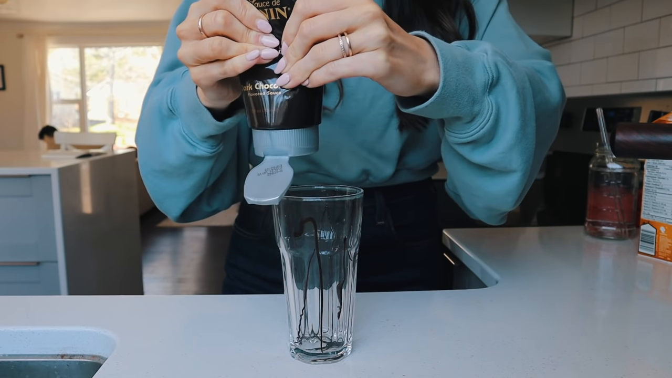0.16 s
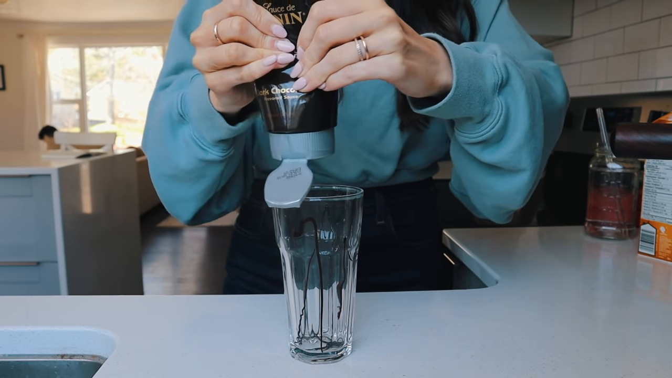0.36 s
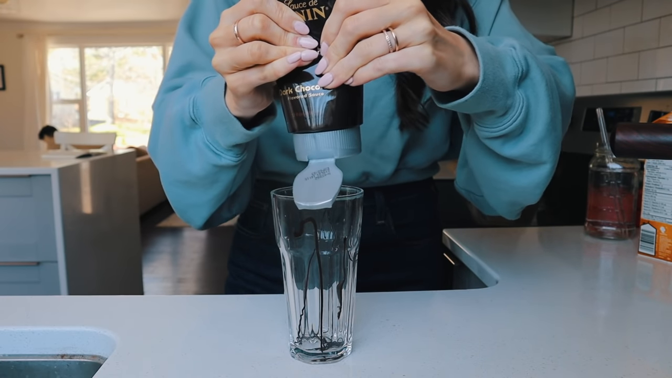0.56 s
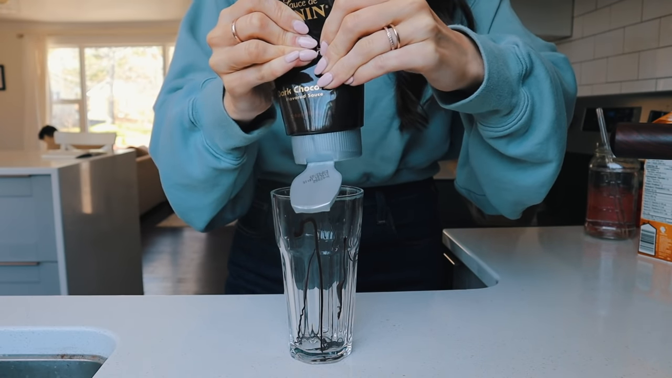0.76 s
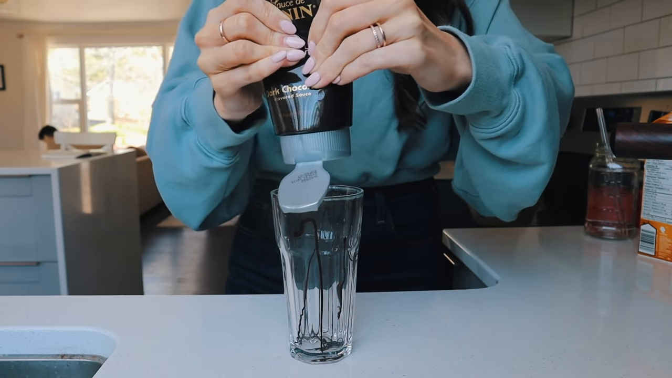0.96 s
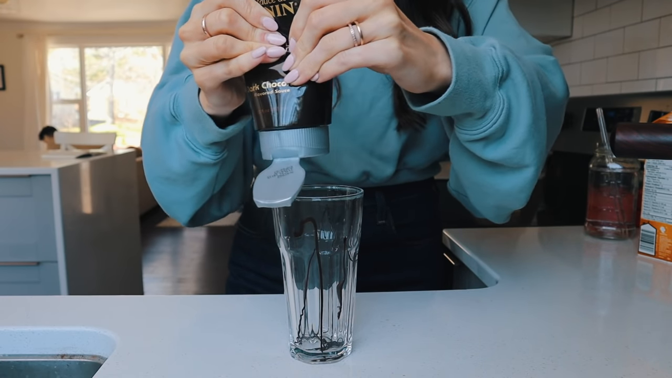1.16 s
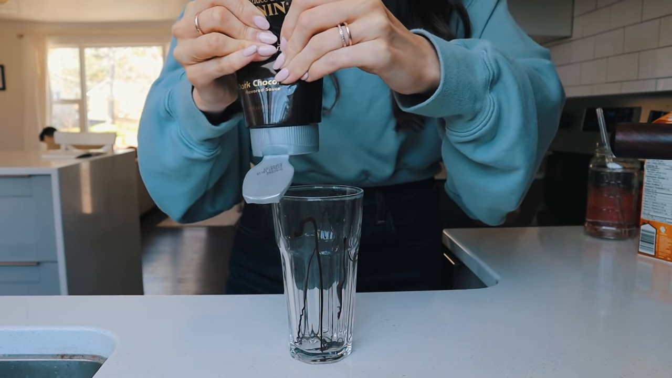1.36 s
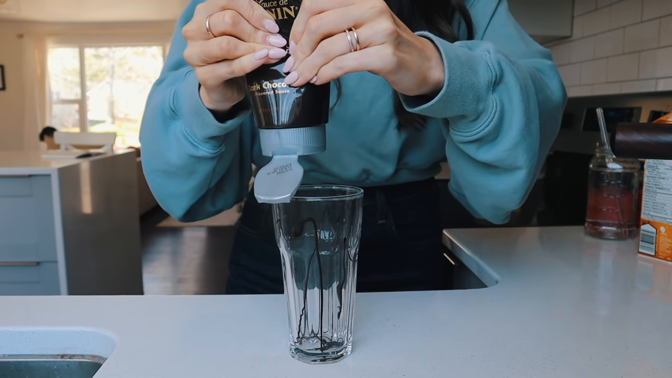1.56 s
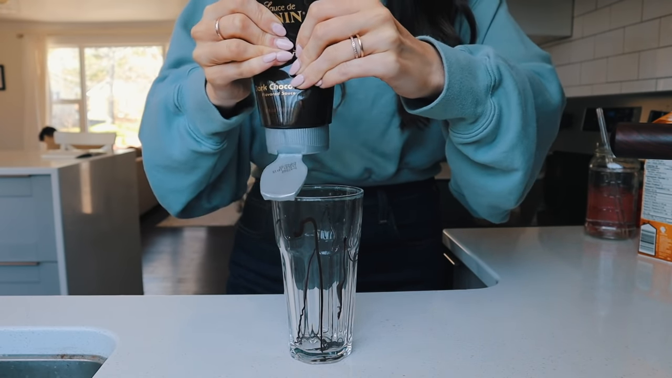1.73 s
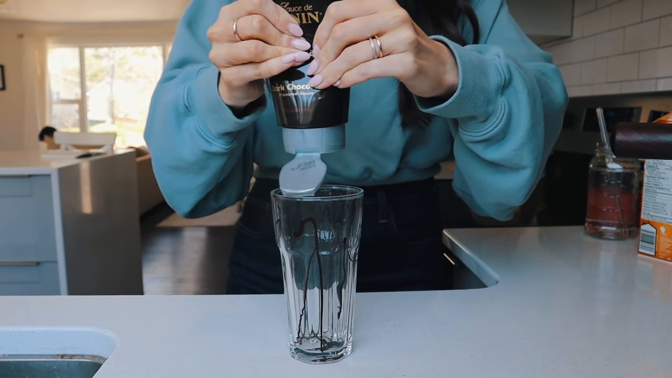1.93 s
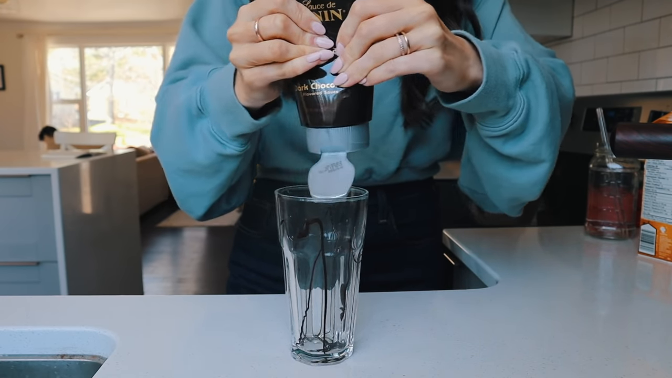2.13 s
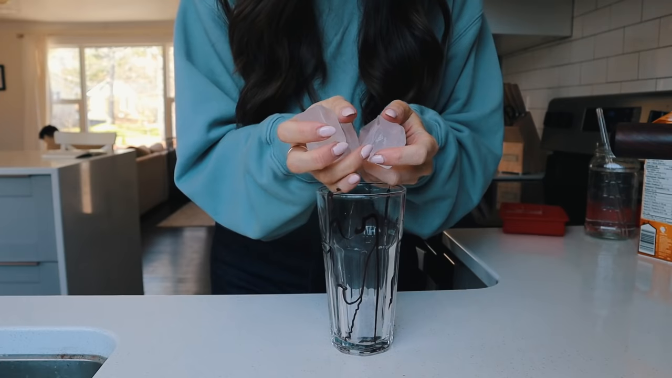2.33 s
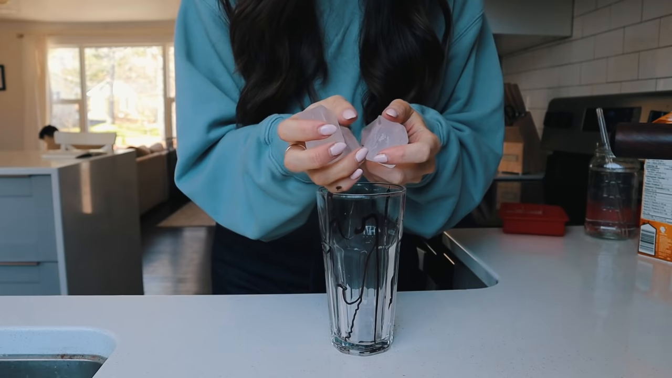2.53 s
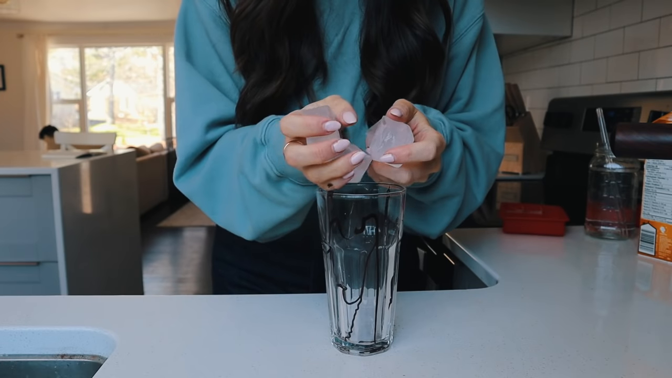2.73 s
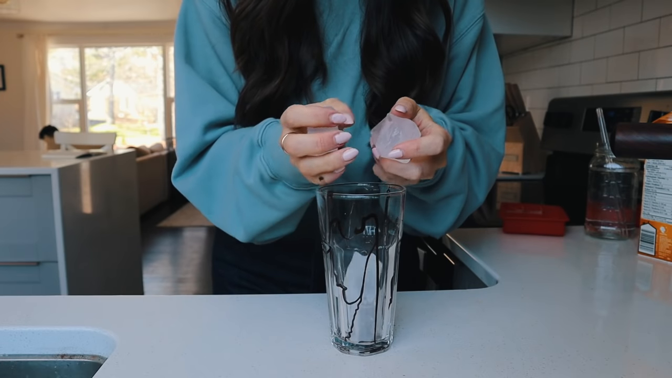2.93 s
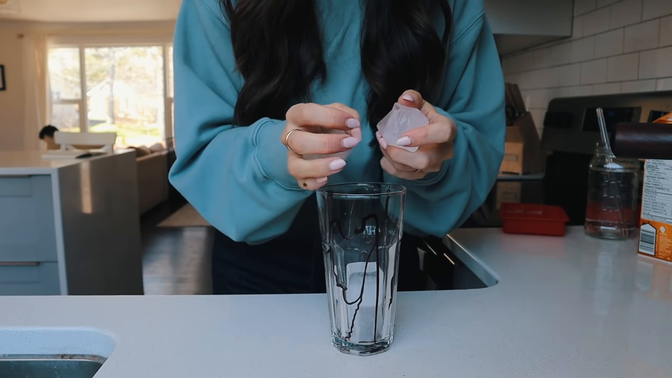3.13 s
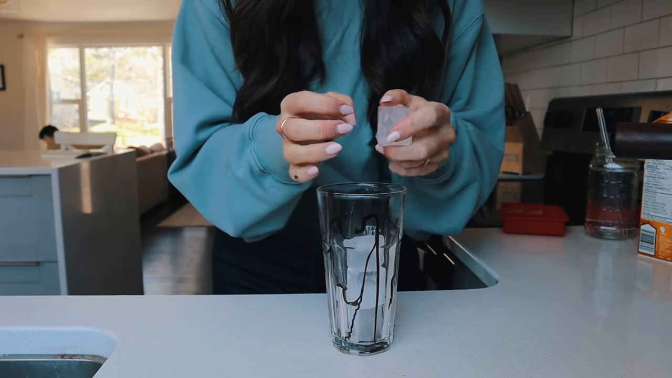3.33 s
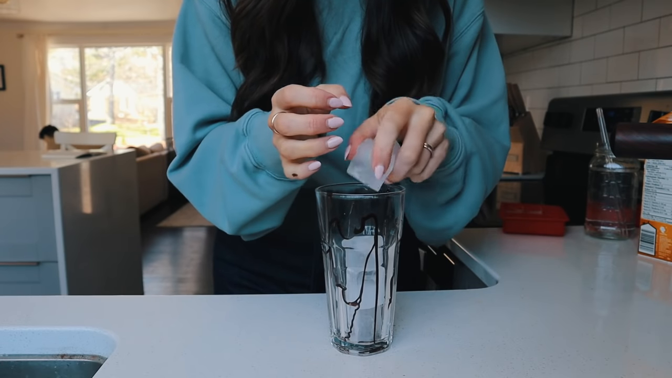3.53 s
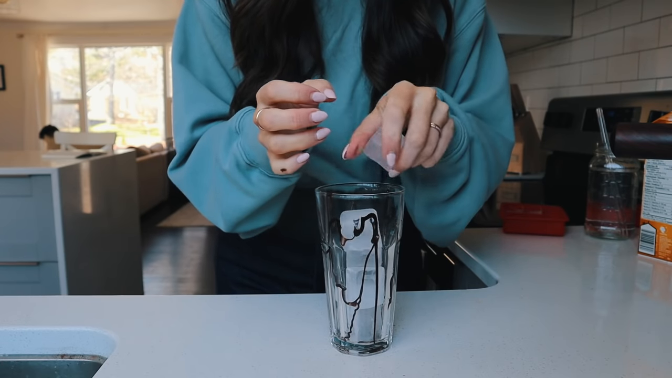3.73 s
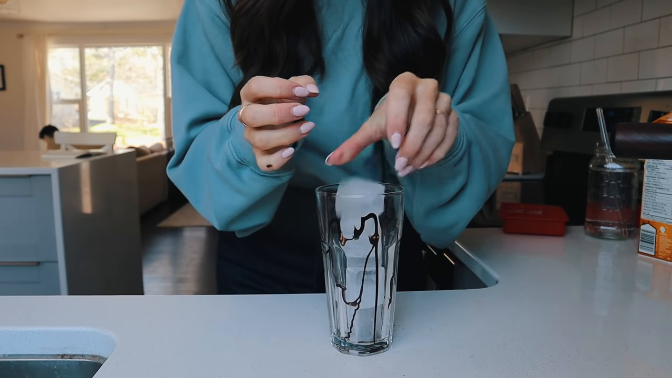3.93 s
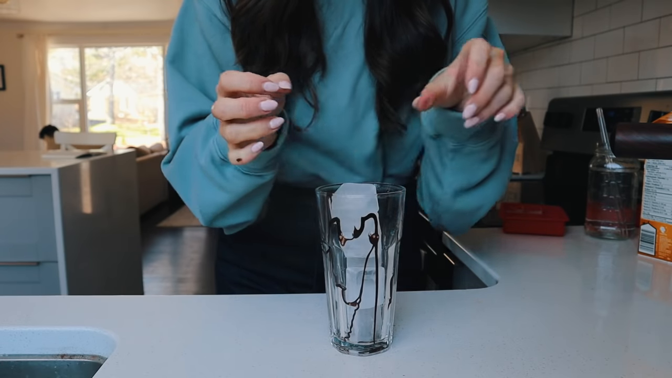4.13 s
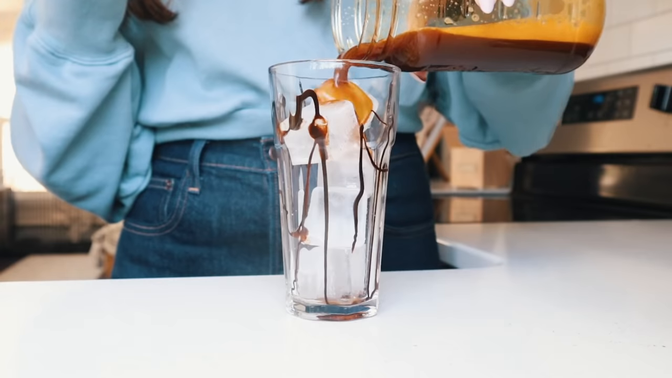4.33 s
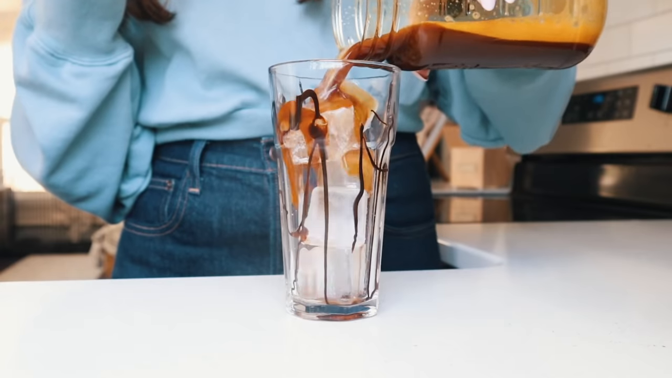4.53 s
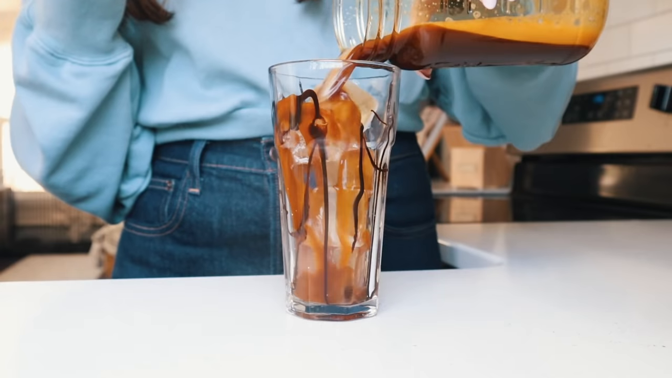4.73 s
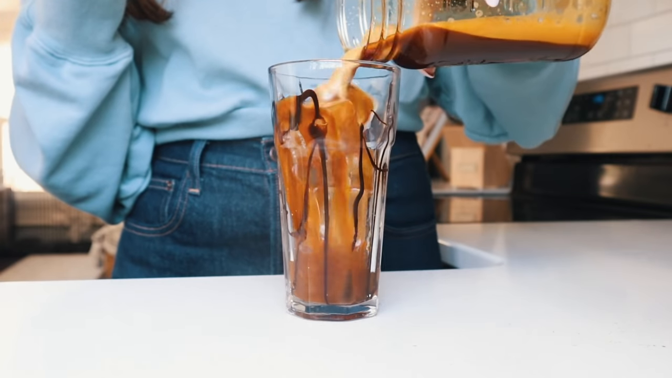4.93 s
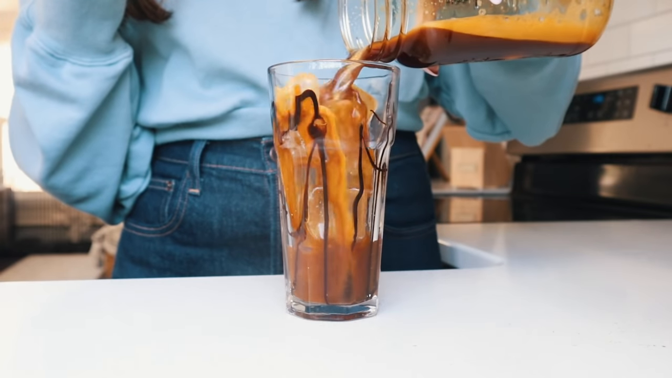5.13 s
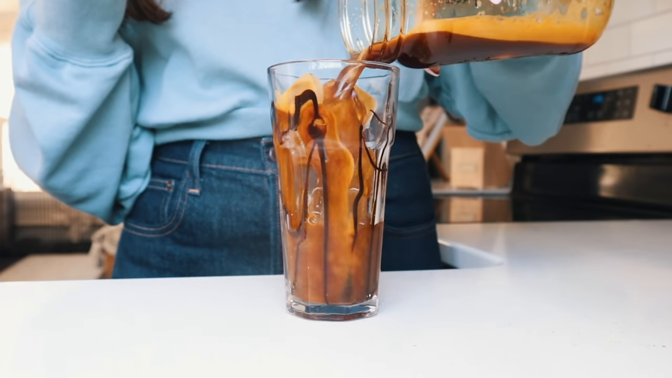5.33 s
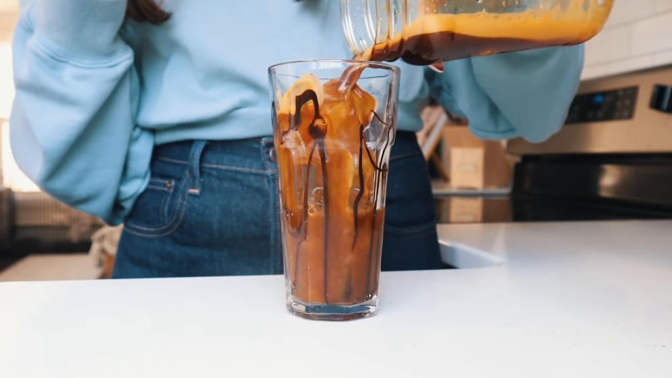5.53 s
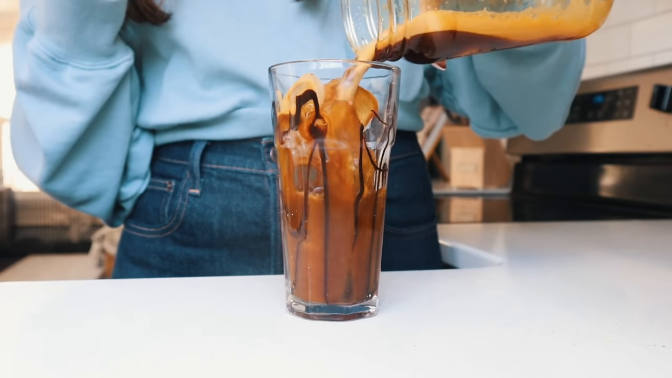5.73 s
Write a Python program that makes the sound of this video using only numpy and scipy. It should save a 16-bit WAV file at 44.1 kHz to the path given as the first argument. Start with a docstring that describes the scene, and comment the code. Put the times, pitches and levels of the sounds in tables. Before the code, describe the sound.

A small live kitchen, heard close in stereo, with a steady low appliance whir and hum behind. At about 0.8 s a squeezed syrup bottle lets out a faint, fading puff of air. Barely audible touches and scrapes of ice begin near 1.8 s. At 2.3 s the first cube drops into a tall thick glass with a bright clink, hollow knocks and a low counter thud, bouncing until 2.5. Another lands around 3.0, a strong clear ring comes at 3.25 with knocks after it, and more clinks follow at 3.7 and 4.0, shorter and drier as the glass fills. The hum softens during the last cubes, then returns. From about 4.4 s coffee trickles in quietly, swelling and easing, with rising bubbles, fine foam fizz and tiny ice cracks, the sharpest near 4.87. Shifting ice gives damped clinks around 5.1 to 5.2; the pour continues to the end, near 5.9.

```python
"""Ice cubes drop one by one into a tall, thick glass on a kitchen counter: decaying tones ring its wall, noise knocks.
Coffee is then poured over them: rising tones bubble over splashing noise, and the ice cracks, shifts and strikes
the filled, damped glass. Bursts of noise contacts make the ice scrape; a syrup bottle spits a puff of noise.
A small live room answers every hit with a decaying noise tail; an appliance whirs (shaped noise) and hums behind."""
import sys
import numpy as np
from scipy import signal
from scipy.fft import rfft, irfft
from scipy.io import wavfile
from scipy.ndimage import uniform_filter1d

SR = 44100
rng = np.random.default_rng(int(sys.argv[2]) if len(sys.argv) > 2 else 0)


def put_to_file(sound):
    """Save the sound as 16-bit audio at rate SR, in the file named by the first command-line argument."""
    columns = np.atleast_2d(sound).T  # one column per channel
    safe = np.clip(columns, -1, 1)
    whole_steps = np.round(safe * 32767)
    wavfile.write(sys.argv[1], SR, whole_steps.astype(np.int16))


N = 259308

# ringing modes of the bare glass wall, lowest first: pitch_hz, twin_offset_hz, t60_s (both before loading by ice)
WALL_MODES = [(2116, 9.4, 0.35), (4116, 1, 0.33), (5014, 5, 0.15), (7054, 44, .11), (8373, 64, 0.12),
              (10825, 180, 0.14)]
# how each wall mode reaches the two ears: left_minus_right_db, phase_between_ears_rad
WALL_EARS = [(-.5, .8), (-1, .9), (-1, .6), (-1, 2.2), (-1.5, 2), (-1.5, 2.1)]
# how each wall mode answers a blow: level_db, rim_family (+1 strongest at the rim, -1 strongest lower down)
WALL_ANSWER = [(-1.5, -0.052), (-8, 1), (-6.5, -1.01), (-12.5, 1), (-8.5, -0.88), (-8.5, 0.3)]
# resonances of the counter under the glass: pitch_hz (typical), t60_s, relative_level_db
COUNTER_MODES = [(129, 0.2, -1), (260, 0.024, -16), (295.7, 0.027, 11), (346.7, 0.046, 0), (438, 0.03, 5)]
# the glass changes with each cube and last with the coffee; state from each time on:
# start_s, air_pitch_hz, air_level_db (relative to the knock), free_ring_share (0-1),
# lowest_mode_left_minus_right_db
FILLING = [(0, 676, 8, 0.6, 4), (2.25, 608, -7, 1, 3.5), (2.9, 716, -1, 0.86, -2.5),
           (3.2, 746.3, 2, 0.88, 0.5), (3.7, 724, -1.5, 0.67, 9.5), (3.95, 695, -10, 0.42, 1),
           (4.3, 702, -5.5, 0.16, -1.5)]
# cubes striking the wall (the first row, at 1.798 s, is a light click on the glass before any cube falls): #
# start_s, ring_db, tilt_db_per_octave, rim_nearness_db, knock_db, # hardness_db (crack relative to knock),
# free_ring_share (0-1, what the touching cube leaves)
CLINKS = [(1.798, -48, -2, 0, -49, 8, 1), (2.093, -40, -5, -5, -47, 2, 0.8),
          (2.3, -13.5, 1, -3.5, -18, -6, 0.73), (2.313, -19.5, -11.5, 10.5, -26.5, -10, 0.92),
          (2.3539, -27.5, 6, -8, -20.5, 1, 0.64), (2.9735, -18, 1.5, -3, -22.5, -0.5, 0.82),
          (3.042, -16.5, -8.5, -14, -27.5, 4, 1), (3.072, -19.5, -16.5, -20.5, -33.5, 5, 1),
          (3.2501, -6, -7.5, 4, -27, 8.5, 0.85), (3.3315, -17, 0.5, -9.5, -42, 16, 0.31),
          (3.7315, -15, -4, 3, -23, 4.5, 1), (3.7375, -9, -8.5, 4.5, -25, -2.5, 0.82),
          (3.7515, -22, 3.5, -9, -20.5, 7, 0.78), (3.998, -22, -0.5, 9.5, -21, 6.5, 1),
          (4.0048, -14.5, 3, -4, -24, 2.5, 0.95), (4.0845, -27, -9.5, -9, -33, 2.5, 0.67),
          (5.1172, -21.5, 2, 11, -22.5, 8, 0.66), (5.1578, -45, -6, -8, -34.5, 13, 0.9),
          (5.1682, -16.5, 1, 11.5, -27.5, 7.5, 1), (5.1865, -26, 6.5, 7.5, -44, 6, 1)]
# cubes landing on the bottom or bumping others: start_s, knock_db, counter_weight_db (relative to knock),
# hardness_db (crack relative to knock)
LANDINGS = [(2.1203, -31.5, -0.5, -19), (2.146, -30.5, -2, -20.5), (2.163, -35.5, -18, -20),
            (2.18, -38, 3.5, -39.5), (2.3685, -15.5, -4, 8.5), (2.437, -24, -6.5, 0), (2.481, -33, 3, -12),
            (2.9988, -19, 7, 2.5), (3.0035, -19, -7.5, -14), (3.151, -32.5, -6.5, -9),
            (3.3105, -17, 0, -2.5), (3.3215, -19.5, -11.5, 4.5), (3.394, -25.5, -16, 3),
            (3.409, -22, -1.5, -1.5), (3.459, -28.5, -14, -15), (3.5127, -31.5, -8, -15)]
# cubes grinding past each other and along the wall: start_s, length_s, level_db (before scaling by length),
# treble_db, air_column_db (both balances within the scrape)
SCRAPES = [(1.958, 0.15, -48.5, -41, 5.5), (2.146, 0.055, -41, -49.5, 2),
           (2.311, 0.029, -21.5, -30.5, 17.5), (2.421, 0.05, -34.5, -24.5, -26.5),
           (2.972, 0.042, -19.5, -15.5, 4.5), (3.314, 0.026, -25.5, 6, 3), (3.398, 0.038, -31, -12, -2.5),
           (3.729, 0.023, -32, -22.5, -4.5), (4, 0.037, -19.5, 5, -1)]
# the clearest cracks of ice under the coffee, and a few bubbles that tick alike: start_s, cube_pitch_hz,
# body_db, bright_edge_db
CRACKS = [(4.534, 2010, -40.5, -57.5), (4.714, 3700, -41, -48), (4.739, 4100, -45.5, -54),
          (4.761, 3230, -45, -37), (4.8656, 3550, -16, -38), (4.896, 3600, -31, -58),
          (4.932, 2940, -39, -43.5), (4.97, 3340, -28, -47), (4.9943, 1800, -36, -52),
          (5.03, 3020, -35, -46), (5.0477, 3320, -24.5, -39.5), (5.384, 2520, -41, -42.5),
          (5.431, 2390, -49, -53), (5.444, 2490, -52, -63), (5.4789, 1680, -33.5, -60),
          (5.51, 2710, -33.5, -42), (5.517, 1870, -49, -45), (5.539, 2920, -36.5, -47),
          (5.545, 1980, -41, -42), (5.565, 2910, -63, -52), (5.604, 2950, -42, -56),
          (5.674, 3790, -39, -46), (5.73, 3000, -39, -42), (5.741, 4630, -40.5, -45),
          (5.796, 3320, -40, -36.5), (5.804, 3180, -48, -43), (5.815, 1750, -46, -42)]
# the largest bubbles in the pour: start_s, start_pitch_hz, level_db
BUBBLES = [(4.799, 1300, -35.5), (4.802, 1705, -38.5), (4.867, 710, -35.5), (4.932, 700, -24),
           (4.938, 1050, -39), (4.978, 626, -29.5), (4.982, 1700, -42.5), (5.029, 568, -33),
           (5.31, 945, -42.5), (5.403, 2360, -43), (5.416, 2470, -49), (5.485, 1114, -38.5),
           (5.572, 2850, -50), (5.61, 1130, -49), (5.813, 1190, -42.5), (5.826, 1720, -46)]
# strength of the trickle, to which each pouring layer adds its own offset: time_s, strength_db
FLOW = [(4.3, -75.5), (4.5, -45), (4.7, -47.5), (4.85, -32.5), (5.0, -38), (5.3, -43.5), (5.5, -35.5),
        (5.7, -42), (5.88, -40.5)]
# room tail by band: centre_hz, t60_s, relative_level_db, side_minus_mid_db
ROOM = [(150, 0.94, -8, -18.5), (450, 0.56, 4, -16), (1050, 0.68, 0, 4), (2200, 0.62, -2, 9),
        (3560, 0.55, -3.5, 11), (4930, 0.57, -3, 8), (7400, 0.37, -8.5, 1), (10300, 0.43, -7.5, -11),
        (14000, 0.3, -16.5, 6)]
# colour of the appliance's whir: pitch_hz, relative_level_db
WHIR = [(15, -42), (25, -11.5), (115, 0), (146, -9.5), (202, -10), (264, -0.5), (354, -9.5), (383, -9.5),
        (415, -14.5), (501, -11.5), (543, -15), (1030, -27), (9020, -49), (11500, -52.5), (15000, -80.5)]
# stereo width of the whir: pitch_hz, side_minus_mid_db
WHIR_SIDE = [(60, -42.5), (110, -22), (200, -17.5), (380, -11), (700, 0), (1290, 5.5), (2380, 6.5),
             (4400, 7.5), (8120, 5), (15000, 12.5)]
# hum lines of the appliance: pitch_hz, width_hz, level_db (before the background dips)
HUM = [(116.4, 1.8, -51.5), (265.2, 3.4, -47)]

TIME = np.arange(N) / SR
RING = TIME[TIME < 1 / 4]  # time since a blow, s
ATTACK = int(.012 * SR)  # samples over which the level of a blow is set
LEFT_RIGHT = np.array([[1], [-1]])

WHIR_DB = -38.5  # rms, before the background dips
# the background is heard more softly while the last cubes fall and is back for the pour
DIP_S, DIP_FALL_S, DIP_DB = 3.1, 0.3, -5.5

PUFF_S, PUFF_DB, PUFF_T60_S = .773, -45, 0.28

POUR_S = 4.3
BUBBLE_T60_S = 0.053
# smaller bubbles: typical pitch, spread in octaves, level relative to the trickle, ring
GURGLE_HZ, GURGLE_OCTAVES, GURGLE_DB, GURGLE_T60_S = 1504, 0.87, -18, 0.046
# the air above the coffee colours the splashing; level relative to the trickle
HOLLOW_HZ, HOLLOW_WIDTH_HZ, HOLLOW_DB = 1080, 220, -19.5

# cracks: snap under the cube's ring (length, relative level), and the faint ones in between
TICK_HZ, TICK_T60_S, TICK_NOISE_DB = 3000, 0.0087, -6  # typical pitch of the faint ones
FAINT_TICK_DB, FAINT_EDGE_DB = -13.5, 1  # relative to the trickle; edge relative to the body
# a cube's own modes: spread in octaves, ring, level relative to the crack
CUBE_OCTAVES, CUBE_T60_S, CUBE_DB = 0.358, 0.021, -7
STRUCK_CUBE_HZ, STRUCK_CUBE_DB = 3112, -6.5  # the same modes in a falling cube

AIR_T60_S, AIR_OVERTONE, AIR_OVERTONE_DB = 0.11, 1.53, -2  # overtone as a pitch ratio
TWIN_DB = -10.5  # weaker twin of each wall mode
NODE_TURN_RAD = 0.77  # spread of the phase between the ears from blow to blow
CHATTER, CHATTER_HZ = 0.66, 67  # full depth and typical speed of the flutter that loose ice gives to the ring
CLINK_THUD_DB = -6.5  # relative to the knock
# a landing shakes the wall only faintly and dully, far from the rim
LANDING_RING_DB, LANDING_TILT_DB, LANDING_RIM_DB, RING_PER_HARDNESS = -7, -5, -5, 0.3
TILT_PER_HARDNESS = 0.12  # dB per octave for each dB: a soft bump leaves the high wall modes still
LANDING_FREE = 0.44  # share of the wall's ring that a landed cube leaves

TOP_HZ = 15700


def undb(db):
    """Decibels to gain."""
    return 10 ** (np.asarray(db) / 20)


def curve(rows, t):
    """Straight lines between (time_s, value) rows."""
    return np.interp(t, *np.transpose(rows))


def spectrum(rows, freqs):
    """Gain from (pitch_hz, level_db) points joined on a log-frequency axis."""
    hz, db = np.transpose(rows)
    return undb(np.interp(np.log(freqs), np.log(hz), db))


def unit(x):
    """Scale to rms 1."""
    return x / np.sqrt(np.mean(x ** 2))


def struck(x, db):
    """Scale a blow so that its attack has this rms level."""
    return x * undb(db) / np.sqrt(np.mean(x[..., :ATTACK] ** 2))


def band(x, lo_hz, hi_hz, order=2):
    """Keep only the sound between two pitches (causal band-pass)."""
    edges = [lo_hz, np.clip(hi_hz, lo_hz + 1, SR / 2 - 1)]
    return signal.sosfilt(signal.butter(order, edges, "band", fs=SR, output="sos"), x)


def add(out, s, x):
    """Mix a sound in at time s."""
    i = int(s * SR)
    out[:, i:i + x.shape[-1]] += x[..., :N - i]


def ears(size, side):
    """Two noises that share all but their side part."""
    mid, diff = rng.standard_normal((2, size))
    return np.array([mid + side * diff, mid - side * diff]) / np.sqrt(1 + side ** 2)


def fade(t60, t=RING):
    """Exponential decay by 60 dB in t60 seconds."""
    return np.exp(-np.log(1000) * t / t60)


def mode(hz, t60, phase=0):
    """One decaying resonance that builds within its first cycle."""
    build = 1 - np.exp(-(2 * hz * RING) ** 2)
    return np.sin(2 * np.pi * hz * RING + phase) * fade(t60) * build


def burst(lo_hz, hi_hz, t60, side, scatter_db, order=2):
    """A contact click and its scatter off the cubes and the counter, within one band."""
    t = RING[:ATTACK * 8]
    click = band(ears(len(t), side) * fade(t60, t), lo_hz, hi_hz, order)
    late = fade(0.044, t) * (1 - fade(0.069, t))
    scatter = band(ears(len(t), side) * late, lo_hz, hi_hz, order)
    return unit(click) + undb(scatter_db) * unit(scatter)


def appliance():
    """Steady whir, alike in both ears in the bass, with two wavering hum lines."""
    freqs = np.arange(N // 2 + 1) * SR / N + 1
    mid, side = rfft(rng.standard_normal((2, N))) * spectrum(WHIR, freqs)
    whir = irfft(mid + LEFT_RIGHT * side * spectrum(WHIR_SIDE, freqs), N)
    out = undb(WHIR_DB) * unit(whir)
    for hz, width_hz, db in HUM:
        hum = band(rng.standard_normal(N), hz - width_hz / 2, hz + width_hz / 2, order=1)
        out += undb(db) * unit(hum)
    return out


def background_gain():
    """Gain over time of the background as heard: lower while the last cubes fall, back for the pour."""
    dip = np.clip((TIME - DIP_S) / DIP_FALL_S, 0, 1) * (TIME < POUR_S)
    return undb(DIP_DB * dip)


def kitchen(send, wet_db):
    """Diffuse tail from hard walls: builds within milliseconds; each band has its own width and decay."""
    t = TIME[:SR]
    freqs = np.arange(SR // 2 + 1) + 1.
    room_hz, t60s, dbs, side_dbs = np.transpose(ROOM)
    mid, side = rfft(rng.standard_normal((2, SR)))
    width = spectrum(list(zip(room_hz, side_dbs)), freqs)
    noise = (mid + LEFT_RIGHT * width * side) / np.sqrt(1 + width ** 2)
    response = 0
    for t60, db, peak in zip(t60s, dbs, np.eye(len(ROOM))):
        overlap = np.interp(np.log(freqs), np.log(room_hz), peak)  # neighbouring bands cross-fade
        response = response + irfft(noise * overlap, SR) * undb(db) * fade(t60, t)
    response = response * np.clip((t - .004) / 0.014, 0, 1) / np.sqrt(SR / 20)
    return undb(wet_db) * signal.fftconvolve(send, response, axes=1)[:, :N]


def puff():
    """Air sputters out of the squeezed syrup bottle: fading noise, strongest in the upper middle."""
    out = np.zeros((2, N))
    air = ears(len(RING), 1.0) * fade(PUFF_T60_S)
    sputter = band(air, 1500, 4700, order=1) + undb(5.5) * band(air, 1300, 2400)
    add(out, PUFF_S, struck(sputter, PUFF_DB))
    return out


def during_pour(count):
    """Random moments in the pour, each with two random deviations (rms 1)."""
    chance = rng.random((count, 3))
    moments = np.interp(chance[:, 0], [0, 1], [POUR_S, TIME[-1]])
    deviations = np.sqrt(3) * (2 * chance[:, 1:].T - 1)
    return zip(moments, *deviations)


def bubbles(out):
    """A trapped bubble rings briefly and rises in pitch; a few are large and many are small."""
    large = [(*row, BUBBLE_T60_S) for row in BUBBLES]
    gurgle = []
    for s, size, pitch in during_pour(count=200):
        hz = GURGLE_HZ * 2 ** (GURGLE_OCTAVES * pitch)
        gurgle.append((s, hz, curve(FLOW, s) + GURGLE_DB + 3 * size, GURGLE_T60_S))
    for s, hz, db, t60 in large + gurgle:
        rising = mode(hz * (1 + 0.37 * RING), t60)
        add(out, s, struck(rising * (1 - fade(0.0016)), db))


def foam(out):
    """Tiny bubbles burst in the foam: very short rising tones, each at its own place between the ears."""
    t = RING[:ATTACK * 3]
    for when, pitch, size, pan in rng.random((1000, 4)):
        s = 4.35 + when * (TIME[-1] - 4.35)
        hz = 750 * 13 ** (pitch ** 1.3)
        tone = np.sin(2 * np.pi * hz * t * (1 + 3 * t))
        grain = tone * fade(22 / hz, t) * (1 - fade(9 / hz, t))
        # size hardly changes the strength; the high ones are softer
        db = curve(FLOW, s) + 0.57 * min(-np.log(1 - size), 2) - 2 - 5 * pitch
        add(out, s, undb(db) * np.sqrt([[pan], [1 - pan]]) * grain)


def pour():
    """Bubbles and bursting foam over a splashing trickle of noise that swells and sinks at random."""
    out = np.zeros((2, N))
    bubbles(out)
    foam(out)
    slow = uniform_filter1d(uniform_filter1d(rng.standard_normal(N), size=700), size=500)
    splash_db = 3 * unit(slow)
    lo_hz, hi_hz = HOLLOW_HZ - HOLLOW_WIDTH_HZ / 2, HOLLOW_HZ + HOLLOW_WIDTH_HZ / 2
    hollow = band(ears(N, 0.94), lo_hz, hi_hz, order=1)
    out += unit(hollow) * undb(curve(FLOW, TIME) + splash_db + HOLLOW_DB)
    trickle = band(ears(N, 1.0), 800, 4500, order=1)
    return out + unit(trickle) * undb(curve(FLOW, TIME) + splash_db - 20.0)


def cube_ping(hz):
    """The brief ring of one ice cube: a few irregular modes around hz."""
    ping = 0
    for pitch, size, lag in rng.uniform(-1.01, 1, (5, 3)):
        mode_hz = hz * 2 ** (CUBE_OCTAVES * pitch)
        ping = ping + undb(2.9 * size) * mode(mode_hz, CUBE_T60_S, np.pi / 2 * lag * LEFT_RIGHT)
    return ping


def ticks():
    """Tiny dry cracks: a snap, the cube's brief ring and a bright edge; faint ones fall between the clear ones."""
    out = np.zeros((2, N))
    faint = []
    for s, size, pitch in during_pour(count=12):
        db = curve(FLOW, s) + FAINT_TICK_DB + 3 * size
        faint.append((s, TICK_HZ * 2 ** (.3 * pitch), db, db + FAINT_EDGE_DB))
    for s, hz, db, edge_db in CRACKS + faint:
        snap = burst(0.64 * hz, 1.12 * hz, t60=TICK_T60_S, side=1.1, scatter_db=-1.5)
        add(out, s, struck(snap, db + TICK_NOISE_DB))
        add(out, s, struck(cube_ping(hz), db + CUBE_DB))
        edge = burst(4100, 18800, t60=0.01, side=1.5, scatter_db=-1.5)
        add(out, s, struck(edge, edge_db))
    return out


def glass_at(s):
    """State of the glass at time s: its row of FILLING without the time."""
    return [row[1:] for row in FILLING if row[0] <= s][-1]


def scrapes():
    """Stick and slip of ice: dense uneven contacts that sound the air column and crunch."""
    out = np.zeros((2, N))
    t = RING[:ATTACK * 14]
    for s, length, db, treble_db, air_db in SCRAPES:
        contacts = (rng.random(len(t)) < 900 / SR) * rng.uniform(.3, 1, len(t))  # about 900 a second
        contacts = contacts * np.clip(2 - 1.5 * t / max(length, .015), 0, 1)
        grit = signal.lfilter([1], [1, -.9], contacts) * ears(len(t), .7)
        air_hz = glass_at(s)[0]
        hollow = band(grit.mean(axis=0), air_hz * (1 - .05), air_hz * (1 + 0.058), order=1)
        crunch = band(grit, 650, 1450, order=3)
        rasp = band(grit, 1200, 3400)
        treble = band(grit, 4200, 8000, order=3)
        sound = undb(air_db) * unit(hollow) + undb(4.0) * unit(crunch)
        sound = sound + undb(treble_db / 2 + 7.0) * unit(rasp) + undb(treble_db) * unit(treble)
        add(out, s, unit(sound) * undb(db) * np.sqrt(abs(length) / t[-1]))
    return out


def flutter():
    """Quick random unevenness, rms 1."""
    return unit(band(rng.standard_normal(len(RING)), CHATTER_HZ / 3, CHATTER_HZ * 2))


def wall_levels(ring_db, tilt_db, rim_db):
    """Level of each wall mode: a sharper blow favours the high ones, the height struck picks the family."""
    octaves = np.log2(np.array(WALL_MODES)[:, 0] / WALL_MODES[0][0])
    answer_db, family = np.transpose(WALL_ANSWER)
    return ring_db + answer_db + tilt_db * octaves + rim_db * family


def glass_wall(levels_db, ring, lowest_pan_db):
    """Bending modes of the wall; ice and liquid resting on it shorten, detune and roughen them."""
    out = 0
    chatter = CHATTER * (1 - ring)
    for k, ((hz, split_hz, t60), (pan_db, lag)) in enumerate(zip(WALL_MODES, WALL_EARS)):
        turn, lean, load = rng.standard_normal(3)
        # the pattern of nodes turns with the place struck, so each ear gets a different share
        blow_pan_db = lowest_pan_db if k == 0 else 2 * lean
        share = undb(LEFT_RIGHT * (pan_db + blow_pan_db) / 2)
        phase = LEFT_RIGHT * (lag + NODE_TURN_RAD * turn + (1 - ring)) / 2
        hz = hz * (1 + .004 * (1 - ring) ** 2 * load)
        # the glass is not quite round, so every mode has a weaker twin that beats against it
        main = mode(hz, t60 * ring, phase + chatter * flutter())
        twin = mode(hz + split_hz / np.sqrt(ring), t60 * ring, -phase)
        pair = main + undb(TWIN_DB) * twin
        out = out + struck(pair * share * (1 + chatter * flutter()), levels_db[k])
    # a thick-wall overtone rings along with the fifth mode
    overtone = mode(10020, 0.1 * ring, 0.74 * LEFT_RIGHT + CHATTER * flutter())
    return out + struck(overtone, levels_db[4] - 13.5)


def counter_thud():
    """The counter booms under the glass: a few low resonances, slightly detuned from blow to blow."""
    thud = 0
    chance = rng.standard_normal((len(COUNTER_MODES), 2))
    for (hz, t60, db), (detune, lag) in zip(COUNTER_MODES, chance):
        thud = thud + undb(db) * mode(hz * (1 + 0.053 * detune), t60, 0.082 * LEFT_RIGHT * lag)
    return band(thud, 240, 1900)


def ice_hit(s, thud_db, knock_db, crack_db, wall_db, free):
    """One blow: the wall rings, the air column and counter boom, the ice itself knocks and cracks."""
    air_hz, air_db, ring, pan_db = glass_at(s)
    ring = np.clip(ring * free, .15, 1)
    out = glass_wall(wall_db, ring, pan_db)
    out += struck(counter_thud(), thud_db)
    air = mode(air_hz, AIR_T60_S, 0.28 * LEFT_RIGHT)
    air = air + undb(AIR_OVERTONE_DB) * mode(air_hz * AIR_OVERTONE, 0.053)
    out += struck(air, knock_db + air_db)
    loose = np.sqrt(ring)  # wedged or floating cubes give shorter knocks and cracks
    low_knock = burst(400, 915, t60=0.017 * loose, side=0.2, scatter_db=6.0)
    add(out, 0, struck(low_knock, knock_db - 2.5))
    high_knock = burst(1054, 1854, t60=0.031 * loose, side=1.0, scatter_db=3.5, order=3)
    add(out, 0, struck(high_knock, knock_db - .8))
    crack = burst(2450, 3010, t60=0.021 * loose, side=0.98, scatter_db=-6.5)
    add(out, 0, struck(crack, crack_db - 1.5))
    add(out, 0, struck(cube_ping(STRUCK_CUBE_HZ), crack_db + STRUCK_CUBE_DB))
    # the first hard touch is a snap of a millisecond or two
    snap = burst(2000, 3180, t60=0.0017, side=1.0, scatter_db=-21.5, order=3)
    add(out, 0, struck(snap, crack_db - 13.5))
    # the same hard contact that rings the upper modes also ticks around them
    tick = burst(3910, 5350, t60=0.021, side=1.0, scatter_db=-17.0, order=3)
    add(out, 0, struck(tick, max(wall_db[1], wall_db[2]) - 4.5 - 4 * ring))
    high_tick = burst(6400, 8900, t60=0.051, side=1.0, scatter_db=-5.0)
    add(out, 0, struck(high_tick, max(wall_db[3], wall_db[5]) - 9.0))
    return out


def cubes():
    """Clinks mostly ring the wall; landings mostly knock and thud."""
    out = np.zeros((2, N))
    for s, ring_db, tilt_db, rim_db, knock_db, hard_db, free in CLINKS:
        wall_db = wall_levels(ring_db, tilt_db, rim_db)
        add(out, s, ice_hit(s, knock_db + CLINK_THUD_DB, knock_db, knock_db + hard_db, wall_db, free))
    for s, knock_db, weight_db, hard_db in LANDINGS:
        ring_db = knock_db + LANDING_RING_DB + RING_PER_HARDNESS * hard_db
        tilt_db = LANDING_TILT_DB + TILT_PER_HARDNESS * hard_db
        wall_db = wall_levels(ring_db, tilt_db, LANDING_RIM_DB)
        add(out, s, ice_hit(s, knock_db + weight_db, knock_db, knock_db + hard_db, wall_db, LANDING_FREE))
    return out


def scene():
    """Ice and coffee close to the microphone, the kitchen around them."""
    blows = cubes()
    small = scrapes() + ticks() + puff() + pour()
    close = blows + small
    return close + kitchen(close, wet_db=-8.5) + appliance() * background_gain()


def record(dry):
    """The microphone's treble falls away above 11 kHz; the recorder rounds the sharpest peaks and cuts the top."""
    dull = signal.sosfilt(signal.cheby1(6, .5, 11100, fs=SR, output="sos"), dry)
    rounded = dull / (1 + (dull / .95) ** 8) ** (1 / 8)
    return signal.sosfilt(signal.ellip(8, .2, 70, TOP_HZ, fs=SR, output="sos"), rounded)


dry = scene()
out = record(dry)
put_to_file(out)
```